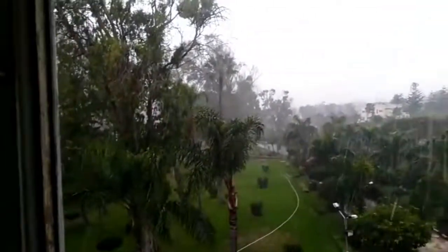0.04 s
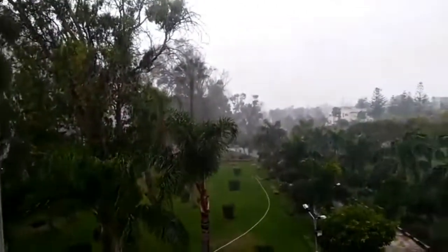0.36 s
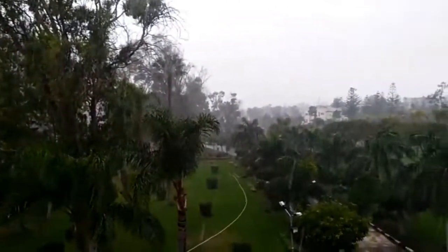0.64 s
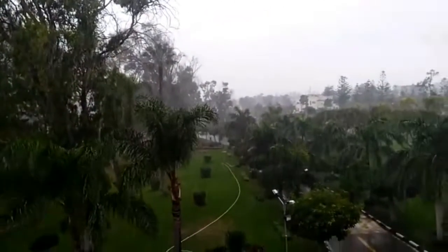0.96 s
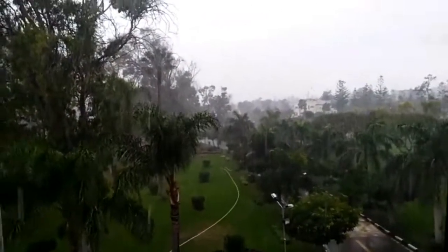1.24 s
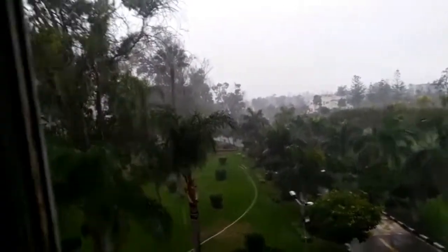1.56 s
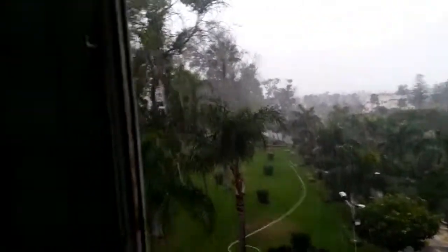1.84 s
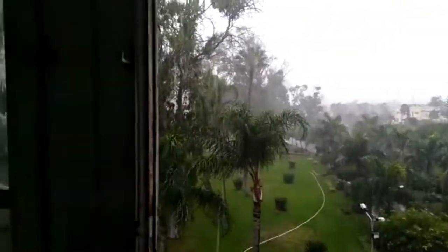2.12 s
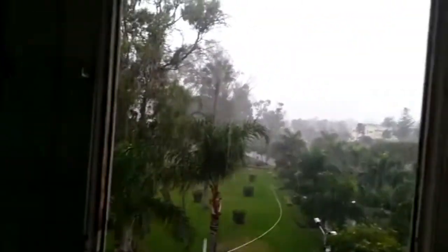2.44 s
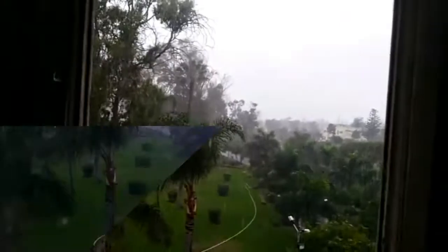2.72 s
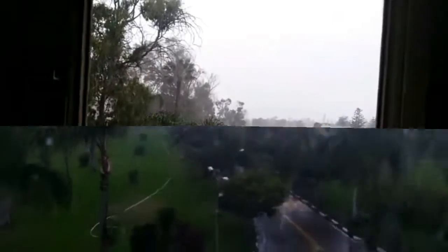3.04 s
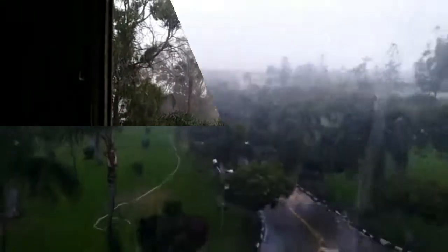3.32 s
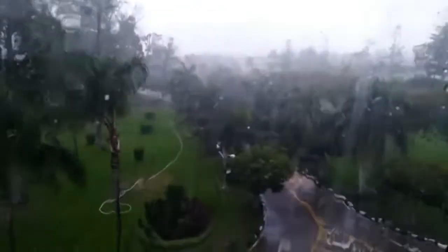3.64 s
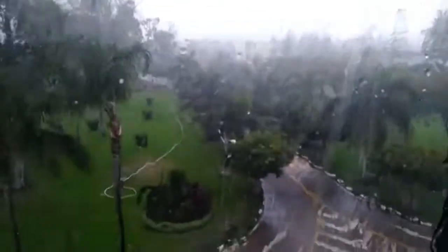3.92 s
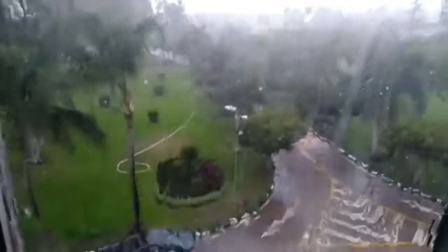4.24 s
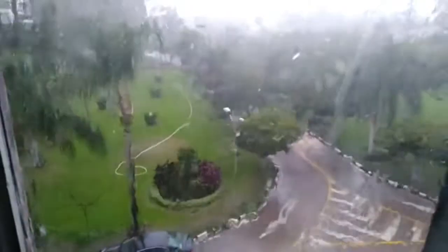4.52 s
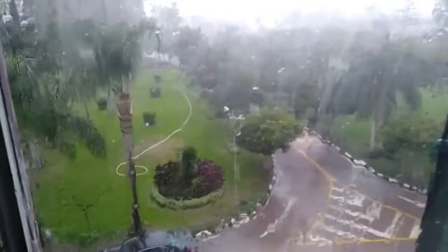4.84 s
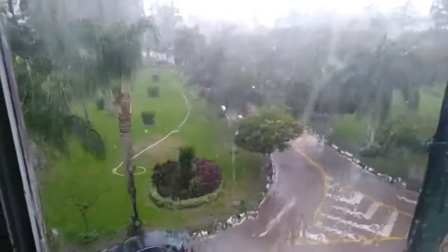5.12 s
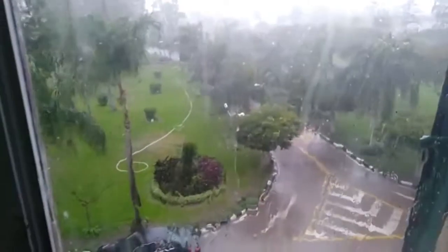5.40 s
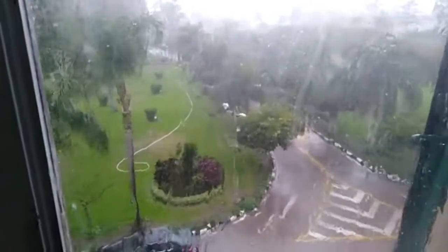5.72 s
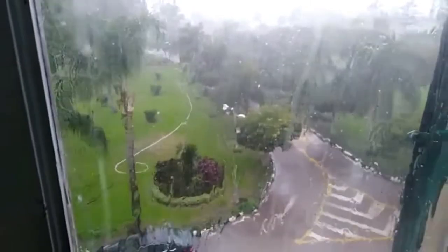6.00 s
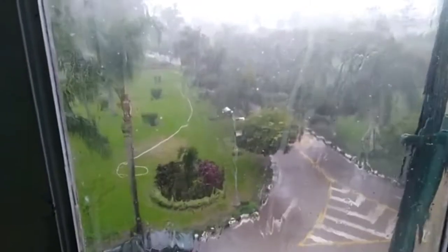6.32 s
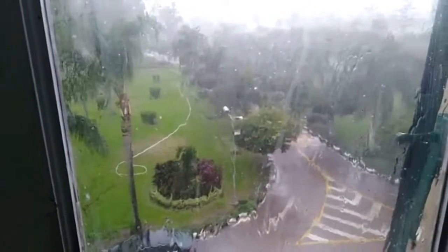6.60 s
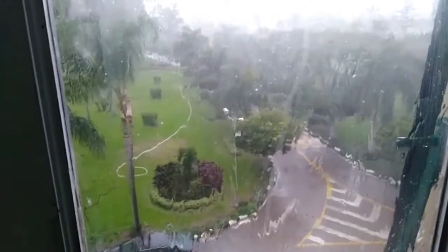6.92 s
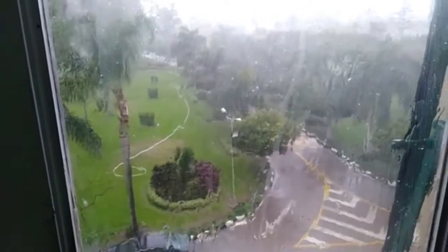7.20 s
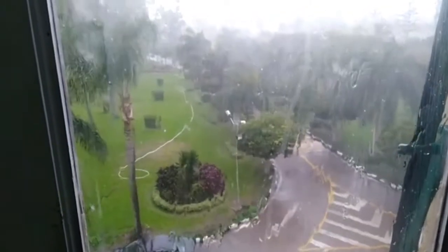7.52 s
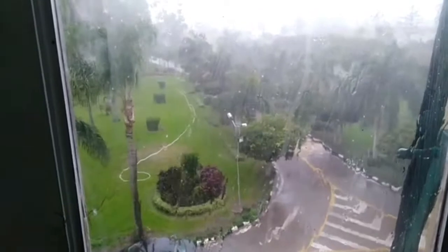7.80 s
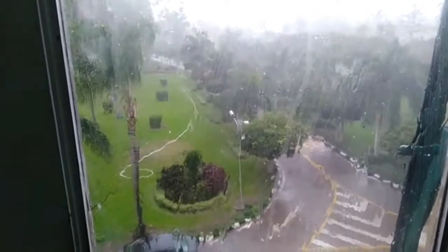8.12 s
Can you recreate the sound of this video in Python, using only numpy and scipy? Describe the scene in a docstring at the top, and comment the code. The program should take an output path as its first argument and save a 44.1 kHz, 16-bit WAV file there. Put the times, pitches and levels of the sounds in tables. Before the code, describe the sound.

Wind hits the microphone in rapid, rumbling gusts, mostly on the right, over the hiss of rain on trees and some sharp drips close by. This dies away, and the sound switches to rain heard from indoors through a closed window. Close drops tap irregularly on the glass and tick on the window frame, with a soft, dull wash, a fine treble hiss and a faint low drone underneath.

```python
"""Rainstorm at a park window

First the window stands open: gusts buffet both microphone ports, and a few close drops tick over the
hiss of rain on leaves and ground. That fades out. Then, behind the shut window, drops knock on the
pane and tick on the frame, with a thin treble hiss, a muffled wash and a faint low hum."""
import sys
import numpy as np
from scipy import signal
from scipy.fft import rfft, irfft
from scipy.io import wavfile
from scipy.ndimage import uniform_filter1d

SR = 44100
rng = np.random.default_rng(int(sys.argv[2]) if len(sys.argv) > 2 else 0)


def generate_wav(signal):
    """Clip the signal to [-1, 1] and save it as 16-bit WAV at the path in sys.argv[1]."""
    frames = np.transpose(np.atleast_2d(signal))
    scaled = np.clip(frames, -1, 1) * 32767
    pcm = np.round(scaled).astype(np.int16)
    wavfile.write(sys.argv[1], SR, pcm)


N = 368235
TIME = np.arange(N) / SR
SHUT_S = 3.55  # cut from the open window to the shut one

# the largest drops bursting on the frame: t/s, relative peak/dB, ring/Hz
FRAME_DROPS = [(0.7346, -20, 7130), (0.9022, -15.5, 7400), (1.1606, -23.5, 6250), (1.1862, -23, 7370),
               (1.2249, -17, 7340), (1.3153, -18, 5900), (1.4923, -24, 6650), (2.0946, -13.5, 5500),
               (2.5097, -26, 6600), (2.6257, -30, 6740), (3.1207, -28.5, 6800), (3.932, -28, 4450),
               (3.9629, -30.5, 6080), (4.1219, -27.5, 6100), (4.1674, -27.5, 6680), (4.2775, -30.5, 6700),
               (4.3212, -30, 6300), (4.685, -30, 5400), (4.7676, -35, 6400), (4.8702, -28.5, 6330),
               (4.9591, -27.5, 4320), (5.0724, -24.5, 6300), (5.1275, -26.5, 7100), (5.1667, -27.5, 6180),
               (5.4952, -28, 6640), (5.5183, -21, 5890), (5.6067, -29.5, 6400), (5.9604, -29.5, 6400),
               (6.555, -33, 6600), (6.8316, -35.5, 5900), (7.1092, -31.5, 6140), (7.1796, -41, 5690),
               (7.5413, -26.5, 5380), (7.7753, -30.5, 6500), (7.8529, -23, 6280), (8.1494, -31.5, 6730)]
# EQ of water bursting on the frame: f/Hz, left/dB, right/dB
FRAME_EQ = [(300, -9, -20), (1570, -11.5, -8.5), (2800, -20, -5), (3320, -15.5, -4.5), (4340, -16, -4),
            (6540, -13.5, 3.5), (8240, -25, -6.5), (11000, -18, -13), (14600, -36, -21.5)]
# swell of the rain behind the shut window: t/s, level/dB
RAIN_SWELL = [(3.62, -50), (3.8, -50), (4.26, -49), (4.44, -51), (4.58, -50), (6.24, -51.5), (6.52, -51.5),
              (7.02, -53), (8.0, -51), (8.34, -51.5)]
# level of the high rain hiss behind the shut window: t/s, level/dB
HISS_SWELL = [(3.62, -58.5), (4.1, -56), (4.44, -59), (4.56, -56), (5.0, -57), (5.55, -56), (6.36, -60),
              (6.62, -60), (7.7, -58.5), (7.95, -56), (8.34, -57.5)]


def gain_of(db):
    """Decibels to a factor."""
    return 10 ** (np.asarray(db) / 20)


def unit_rms(x):
    """Scales to rms 1."""
    return x / np.sqrt(np.mean(x ** 2) + 1e-20)


def curve(rows):
    """Joins (time, value) rows by straight lines."""
    return np.interp(TIME, *np.transpose(rows))


def spectrum_at(rows, hz):
    """Every value column of a spectrum table, interpolated on a log-frequency axis."""
    f, *columns = np.transpose(rows)
    return np.array([np.interp(np.log(hz + 1), np.log(f + 1), c) for c in columns])


def equalise(x, rows):
    """Minimum-phase EQ from a table; the result is stereo."""
    gain_db = spectrum_at(rows, abs(np.fft.fftfreq(2048, 1 / SR)))
    response = np.exp(np.conj(signal.hilbert(np.log(gain_of(gain_db)))))
    impulse = np.fft.ifft(response).real[:, :1024]
    return signal.oaconvolve(x * np.ones((2, 1)), impulse, axes=1)[:, :x.shape[-1]]


def band(x, lo_hz, hi_hz):
    """One band of the mono mix."""
    return signal.sosfilt(signal.butter(4, [lo_hz, hi_hz], "band", fs=SR, output="sos"), x.mean(0))


def wander(rate_hz):
    """Smooth random drift of rms 1, rolling off above the rate."""
    low_pass = 1 + (np.fft.rfftfreq(N, 1 / SR) / rate_hz) ** 4
    return unit_rms(irfft(rfft(rng.standard_normal(N)) / low_pass, N))


def add(mix, start_s, sound):
    """Lays a stereo sound into the mix."""
    part = mix[:, round(start_s * SR):][:, :sound.shape[1]]
    part += sound[:, :part.shape[1]]


def rain_noise(grain, per_s, spread_db):
    """White noise with a grain of random clicks: many small, few large."""
    noise = rng.standard_normal(N)
    size = gain_of(spread_db * np.minimum(rng.exponential(1, N), 4))
    clicks = size * rng.choice([-1, 1], N) * (rng.random(N) < per_s / SR)
    return noise + grain * unit_rms(clicks)


def shimmer(x, depth_db):
    """Makes a hiss flicker in patches a few hundred hertz wide and tens of milliseconds long."""
    spectra = signal.stft(x, nperseg=512)[2]
    patches = uniform_filter1d(rng.standard_normal(spectra.shape), size=5, axis=1)
    patches = unit_rms(uniform_filter1d(patches, size=7, axis=2))
    return signal.istft(spectra * gain_of(depth_db * patches))[1][:, :N]


def gust(start_s, hold_s, attack_s=0.0042, release_s=0.013, slap_db=3.5, slap_s=0.0079):
    """Envelope of one gust: it arrives with a slap, holds and dies away."""
    age = np.maximum(TIME - start_s, 0)
    slap = gain_of(slap_db * np.exp(-age / slap_s))
    release = np.exp(-np.maximum(age - hold_s, 0) / release_s)
    return np.minimum(age / attack_s, 1) * slap * release


def wind(port, breeze, trim_db, corner_hz, opening, steepness, flutter_db):
    """Eddies at one port: the harder it blows, the smaller they are and the higher the rumble reaches."""
    # gusts striking a port: t/s, length/s, strength/dB, port
    gusts = [(0, 0.022, -13, "right"), (0.114, 0.03, -12, "right"), (0.162, 0.069, -8.5, "right"),
             (.271, 0.075, -13.5, "right"), (0.394, 0.1, -8.5, "right"), (0.479, 0.13, -17, "left"),
             (0.638, 0.04, -15, "right"), (0.739, 0.03, -5.5, "right"), (0.774, 0.027, -13.5, "left"),
             (0.812, 0.013, -6.5, "right"), (0.869, .06, -10.5, "right"), (.915, 0.033, -18, "left"),
             (0.967, 0.154, -11, "right"), (1.026, 0.081, -14, "left"), (1.216, 0.079, -11, "left"),
             (1.34, 0.067, -15.5, "left"), (1.381, 0.039, -7, "right"), (1.6, 0.083, -2.5, "right"),
             (1.623, 0.067, -16, "left"), (1.717, 0.016, -11, "right"), (1.788, 0.058, -11.5, "right"),
             (1.826, .04, -15.5, "left"), (1.862, 0.055, -9.5, "right"), (1.944, 0.035, -16.5, "left"),
             (1.999, 0.047, -9, "right"), (2.052, 0.14, -23, "left"), (2.098, 0.029, -11, "right"),
             (2.266, 0.021, -13, "right"), (2.345, 0.066, -19.5, "right"), (2.443, .05, -21, "right"),
             (2.512, 0.02, -21, "left"), (2.62, .025, -18.5, "right"), (2.765, 0.047, -25, "right"),
             (2.87, 0.0098, -15.5, "right"), (2.903, 0.065, -21.5, "left"), (3.236, 0.046, -33, "left")]
    # the port's response to eddies: f/Hz, level/dB
    port_eq = [(20, -9), (40, -12), (62, -4), (85, 0.5), (125, 1), (200, -2.5), (400, -9.5), (800, -15.5),
               (1600, -27.5), (4000, -30)]
    blows = [gain_of(db) * gust(s, length) for s, length, db, side in gusts if side == port]
    strength = np.linalg.norm([gain_of(curve(breeze)), *blows], axis=0)
    strength_db = 20 * np.log10(strength) + flutter_db * wander(68)
    hz, t, spectra = signal.stft(rng.standard_normal(N), SR, nperseg=512, noverlap=384)
    # the low-pass sits at corner_hz for a strength of -16.5 dB and opens as the wind rises
    corner = corner_hz * gain_of(opening * (np.interp(t, TIME, strength_db) + 16.5))
    spectra = spectra / np.sqrt(1 + (hz[:, None] / corner) ** steepness)
    eddies = equalise(signal.istft(spectra, nperseg=512, noverlap=384)[1][:N], port_eq)[0]
    power = uniform_filter1d(uniform_filter1d(eddies ** 2, size=900), size=900)
    push = uniform_filter1d(uniform_filter1d(gain_of(strength_db + trim_db), size=80), size=80)
    low_cut = signal.butter(6, 55, "high", fs=SR, output="sos")
    return signal.sosfilt(low_cut, eddies / np.sqrt(power + 1e-20) * push)


def open_rain(trim_db=1, flicker_db=1.08):
    """Countless drops on leaves and ground merge to a hiss; nearer ones give it grain."""
    # fader ride of the hiss: t/s, level/dB
    fader = [(0.0, -40.5), (0.22, -47.5), (0.44, -44.5), (1.24, -41), (1.94, -48), (2.48, -46.5),
             (3.0, -54), (3.38, -62.5), (3.52, -74.5)]
    # EQ of rain through the open window: f/Hz, left/dB, right/dB
    hiss_eq = [(60, -18.5, -8), (400, -0.5, 7.5), (864, 4, -2), (1500, -2.5, 0.5), (2530, -5.5, -5),
               (3950, -8, -5.5), (5100, -12.5, -3), (6520, -17.5, -1), (7870, -23, -7.5),
               (11060, -22.5, -17.5), (14800, -30.5, -23.5)]
    ports = [rain_noise(grain=0.55, per_s=1500, spread_db=3.2) * gain_of(flicker_db * wander(27))
             for _ in range(2)]
    hiss = shimmer(equalise(np.array(ports), hiss_eq), depth_db=2)
    return hiss / band(hiss, 2500, 9000).std() * gain_of(curve(fader) + trim_db)


def drop(hz, eq, ring, ring_s, splash_s, attack_s, tail_db, tail_s):
    """One impact: a short ring, a burst of splash and a faint tail from the window recess."""
    t = np.arange(6000) / SR
    tone = np.sin(2 * np.pi * hz * t) * np.exp(-t / ring_s)
    tail = gain_of(tail_db) * np.exp(-t / tail_s) * (1 - t / t[-1])
    splash = rng.standard_normal((2, len(t))) * (np.exp(-t / splash_s) + tail)
    return equalise((ring * tone + splash) * (1 - np.exp(-t / attack_s)), eq)


def scatter(fraction, swell):
    """Spreads 0..1 over the shut-window scene: the times, and the swell there in dB about its mean."""
    when = SHUT_S + fraction * (TIME[-1] - SHUT_S)
    return when, np.interp(when, *np.transpose(swell)) - np.mean(swell, axis=0)[1]


def frame_ticks(trim_db=-1, lag_s=0.0001, faint_count=80):
    """Close drops burst on the frame, bright and to the right; fainter ones join behind the shut window."""
    fraction, size, pitch = rng.random((faint_count, 3)).T
    when, swell_db = scatter(fraction, HISS_SWELL)
    faint_db = -46 + swell_db - 4 * np.log(size + 0.014)
    out = np.zeros((2, N))
    for s, db, hz in [*FRAME_DROPS, *zip(when, faint_db, 5100 * 1.45 ** pitch)]:
        tick = drop(hz, FRAME_EQ, ring=0.98, ring_s=0.00063, splash_s=0.0019, attack_s=0.00046,
                    tail_db=-28.5, tail_s=0.072)
        peak = abs(band(tick, 4000, 15000)).max()
        add(out, s + lag_s, tick / peak * gain_of(db + trim_db))
    return out


def muffled_rain():
    """Through the glass comes a dull wash, alike at both ports in the bass."""
    # EQ of rain through the glass: f/Hz, left/dB, right/dB
    wash_eq = [(29.8, -21, -25), (58.6, -5.5, -4.5), (104.4, 5, 5.5), (175, -3, -3.5), (232, -1.5, -1),
               (304, -4.5, -4.5), (583, -9, -7.5), (643, -7, -5.5), (905, -11, -11), (1390, -18.5, -15.5),
               (2000, -20.5, -12.5), (2620, -51, -34.5), (4000, -68, -29), (12000, -69, -66)]
    # stereo image of the wash: f/Hz, left-right correlation
    image = [(60, 1), (180, 1), (550, 0.75), (1650, 0), (4970, 1), (15000, -0.0)]
    left, other = (rfft(rain_noise(grain=0.21, per_s=700, spread_db=2.7)) for _ in range(2))
    alike = spectrum_at(image, np.fft.rfftfreq(N, 1 / SR))[0]
    right = alike * left + np.sqrt(1 - alike ** 2) * other
    wash = equalise(irfft(np.array([left, right]), N), wash_eq)
    return wash / band(wash, 500, 2200).std() * gain_of(curve(RAIN_SWELL))


def hiss_lift(max_db=2.5, decay_s=0.075):
    """Lift in dB: the treble hiss swells briefly after each loud tick, more after the louder ones."""
    lift = sum(gain_of(db + 26.5) * (TIME > s) * np.exp(-abs(TIME - s) / decay_s)
               for s, db, _ in FRAME_DROPS)
    return max_db * np.tanh(lift)


def treble_hiss(thin_trim_db=-1, broad_db=-64, flicker_db=2.5):
    """A thin, peaky treble hiss of rain that fills out and broadens as it gets louder."""
    # peaky EQ of the thin layer: f/Hz, left/dB, right/dB
    thin_eq = [(1500, -39, -61), (2590, -42, -6.5), (3200, -34, 11), (3630, -39, 11), (3900, -42, 2),
               (4700, -50, -16), (5200, -1, 8), (6960, -50, 8.5), (8300, -51, -36), (9150, -24, -9),
               (10740, -44, -4.5), (11800, -49, -32), (14500, -25, -12)]
    level_db = curve(HISS_SWELL) + hiss_lift()
    excess_db = level_db - np.mean(HISS_SWELL, axis=0)[1]
    thin = shimmer(equalise(rng.standard_normal((2, N)), thin_eq), depth_db=1)
    thin *= gain_of(level_db + thin_trim_db) / band(thin, 3000, 10000).std()
    grainy = np.array([rain_noise(grain=0.5, per_s=2500, spread_db=1.3) for _ in range(2)])
    broad = shimmer(equalise(grainy, FRAME_EQ), depth_db=3)
    broad *= gain_of(broad_db + 2 * excess_db) / band(broad, 3000, 10000).std()
    return (thin + broad) * gain_of(flicker_db * wander(32))


def hum(hz=54, trim_db=-1, fifth_db=-8, waver=0.0037):
    """A low, slightly unsteady drone, as of a far motor, with a weaker tone a fifth above."""
    # fader ride of the hum: t/s, level/dB
    fader = [(3.6, -64), (4.2, -70), (4.35, -54), (5.9, -59), (6.08, -71), (6.25, -54), (6.9, -53),
             (7.08, -73), (7.35, -47.5), (8.35, -48.5)]
    phase = 2 * np.pi * np.cumsum(hz * (1 + waver * wander(4.9))) / SR
    drone = np.sin(phase) + gain_of(fifth_db) * np.sin(1.5 * phase)
    return unit_rms(drone) * gain_of(curve(fader) + trim_db)


def pane_taps(lag_s=0.00027, light_count=120):
    """Heavy drops knock on the glass; lighter ones patter between them, louder as the rain swells."""
    # the heaviest drops on the pane: t/s, peak/dB, ring/Hz
    heavy_drops = [(3.633, -24, 1290), (3.703, -25.5, 910), (3.767, -31, 1230), (3.838, -32, 1190),
                   (3.928, -30.5, 993), (4.117, -30, 1180), (4.546, -23.5, 1010), (4.569, -29, 958),
                   (4.746, -29, 990), (4.855, -29, 895), (4.898, -31.5, 1170), (4.932, -32.5, 953),
                   (5.408, -34, 969), (5.624, -31.5, 996), (6.093, -32.5, 993), (6.696, -38, 895),
                   (7.346, -29.5, 930), (7.75, -32.5, 955), (7.779, -29.5, 902), (7.858, -32, 990),
                   (8.127, -31.5, 920)]
    # EQ of a knock on the glass: f/Hz, left/dB, right/dB
    glass_eq = [(150, -28, -17), (445, -1, 1), (695, 8, 9.5), (1270, 5, -2.5), (2200, -0.5, 6),
                (2860, -19, -14), (3640, -26, -7), (4400, -22, -14), (11800, -33, -27)]
    fraction, pitch, size = rng.random((light_count, 3)).T
    when, swell_db = scatter(fraction, RAIN_SWELL)
    light_db = -42 + 2 * swell_db - 4.5 * np.log(size + 0.17)
    out = np.zeros((2, N))
    for s, db, hz in [*heavy_drops, *zip(when, light_db, 700 * 3.2 ** pitch)]:
        tap = drop(hz, glass_eq, ring=0.41, ring_s=0.0013, splash_s=0.0014, attack_s=0.000089,
                   tail_db=-21.5, tail_s=0.035)
        peak = abs(band(tap, 700, 2800)).max()
        add(out, s + lag_s, tap / peak * gain_of(db))
    return out


def scene():
    """The open window, a brief gap, then the shut one; drops tick on the frame in both."""
    # steady push of the wind at the left and at the right port: t/s, strength/dB
    breeze_left = [(0, -33), (.42, -32), (1.28, -14), (2.0, -26), (2.3, -36.5), (2.8, -37.5), (3.12, -33),
                   (3.38, -50.5), (3.54, -49.5)]
    breeze_right = [(0, -21), (.62, -21.5), (1.1, -14.5), (1.55, -14.5), (1.9, -12.5), (2.2, -19.5),
                    (2.58, -32), (3.02, -27.5), (3.4, -46.5), (3.54, -45)]
    left = wind("left", breeze_left, trim_db=1.8, corner_hz=452, opening=0.15,
                steepness=6.1, flutter_db=2)
    right = wind("right", breeze_right, trim_db=-0.5, corner_hz=450, opening=0.53,
                 steepness=5.6, flutter_db=3.5)
    window_open = np.array([left, right]) + open_rain()
    window_shut = muffled_rain() + treble_hiss() + pane_taps() + hum()
    fade_out = np.clip((SHUT_S - 0.01 - TIME) / 0.01, 0, 1)
    fade_in = np.clip((TIME - SHUT_S - 0.01) / 0.025, 0, 1)
    return fade_out * window_open + fade_in * window_shut + frame_ticks()


def record(dry, knee=5, top_hz=15900):
    """The strongest gusts overload the input, which rounds their peaks with a rasp; then a high cut."""
    clipped = dry / (1 + abs(dry) ** knee) ** (1 / knee)
    high_cut = signal.firwin(511, top_hz, window=("kaiser", 9), fs=SR)
    return signal.oaconvolve(clipped, high_cut[None], "same")


dry = scene()
out = record(dry)
generate_wav(out)
```